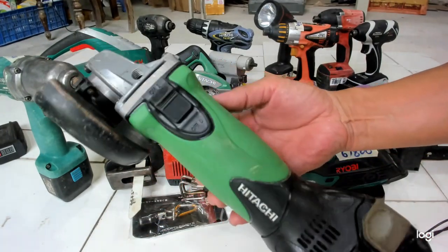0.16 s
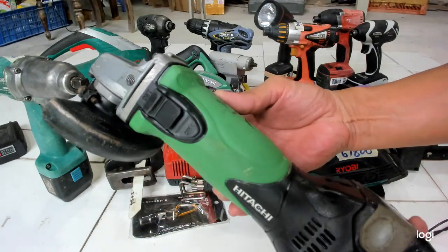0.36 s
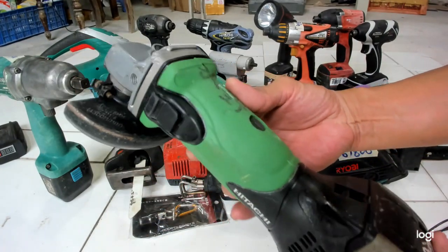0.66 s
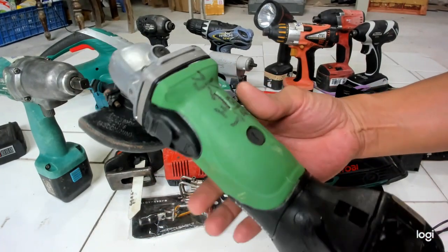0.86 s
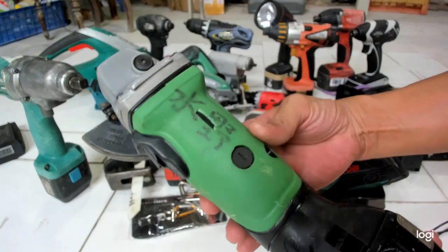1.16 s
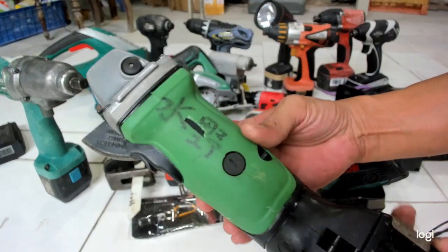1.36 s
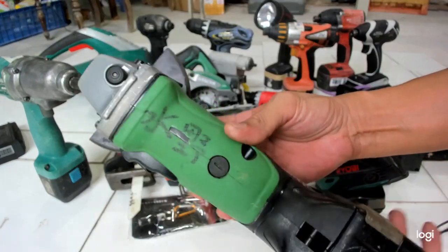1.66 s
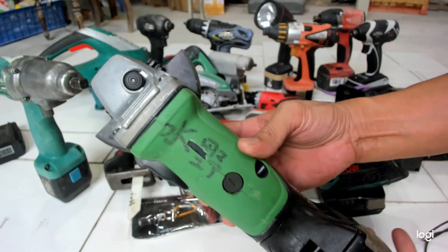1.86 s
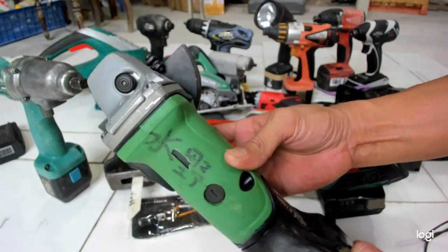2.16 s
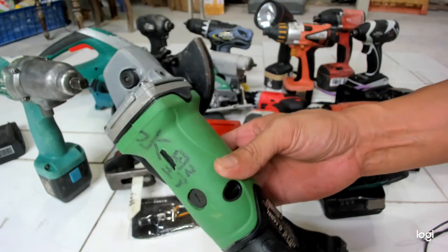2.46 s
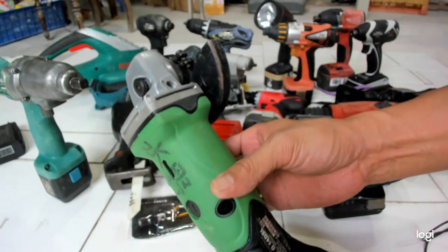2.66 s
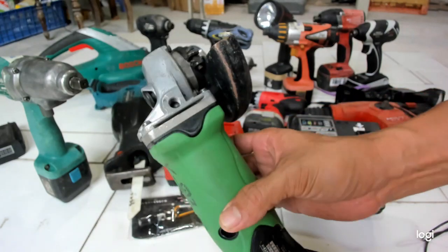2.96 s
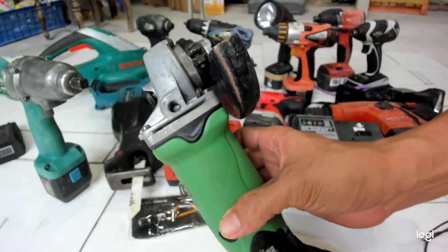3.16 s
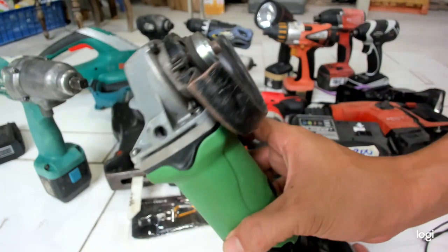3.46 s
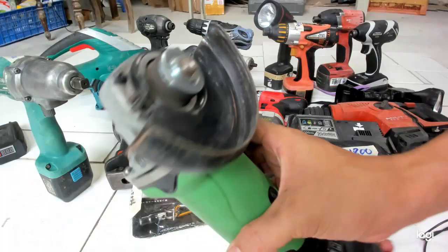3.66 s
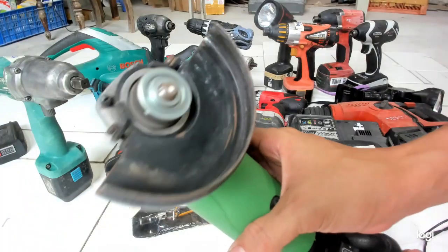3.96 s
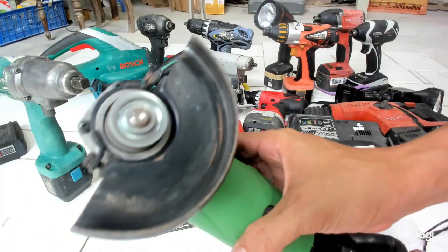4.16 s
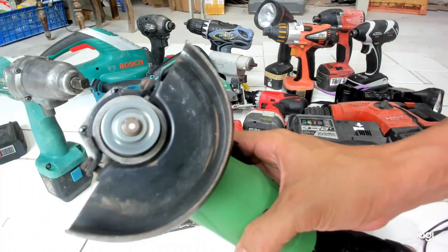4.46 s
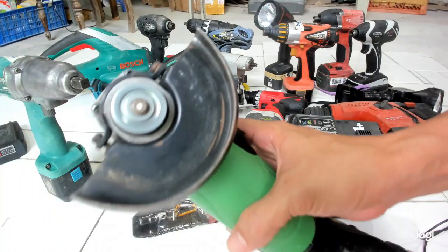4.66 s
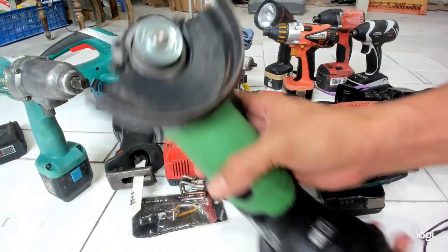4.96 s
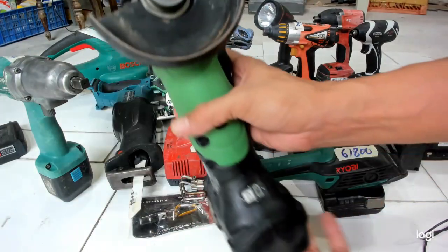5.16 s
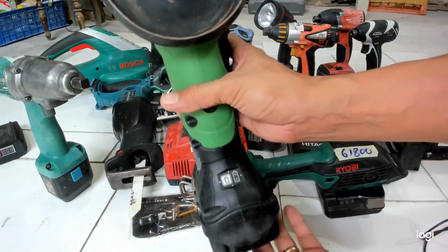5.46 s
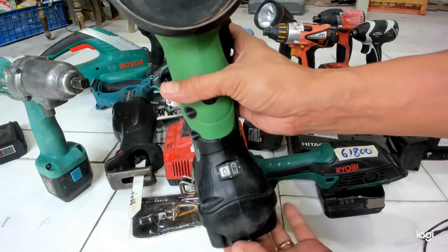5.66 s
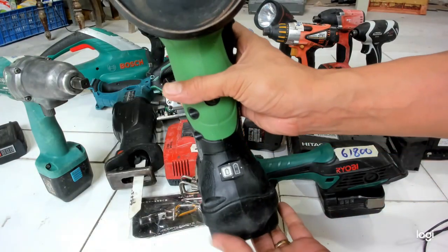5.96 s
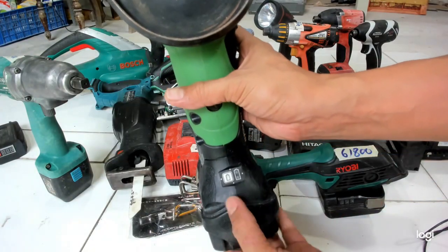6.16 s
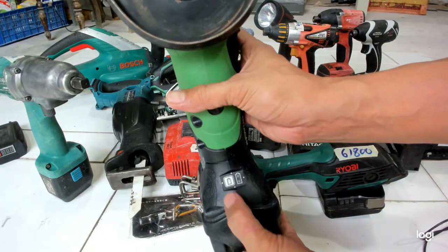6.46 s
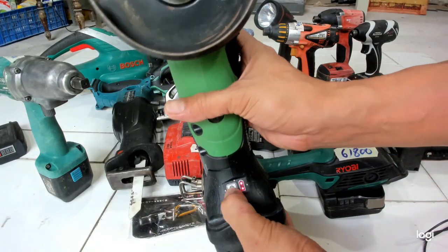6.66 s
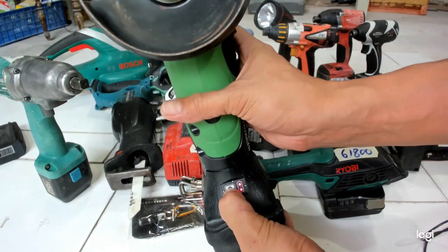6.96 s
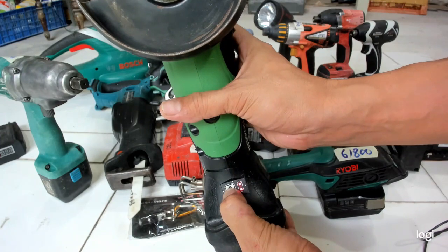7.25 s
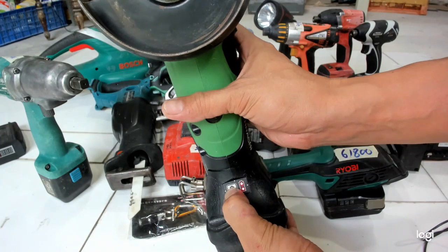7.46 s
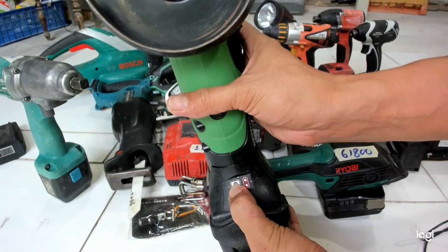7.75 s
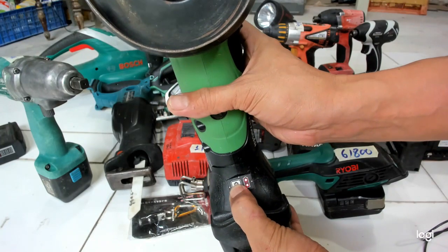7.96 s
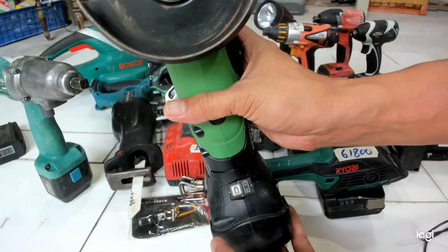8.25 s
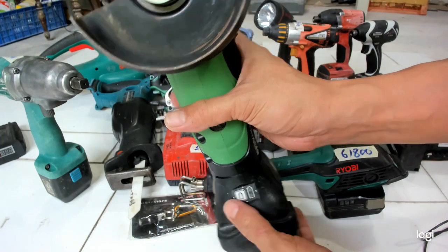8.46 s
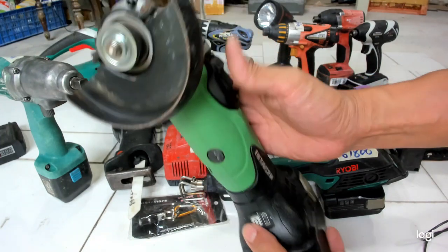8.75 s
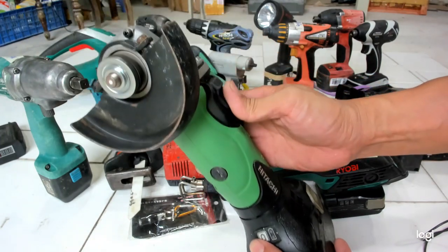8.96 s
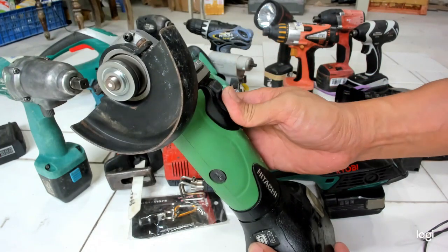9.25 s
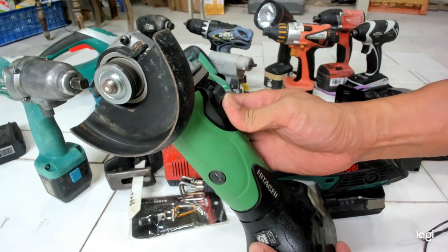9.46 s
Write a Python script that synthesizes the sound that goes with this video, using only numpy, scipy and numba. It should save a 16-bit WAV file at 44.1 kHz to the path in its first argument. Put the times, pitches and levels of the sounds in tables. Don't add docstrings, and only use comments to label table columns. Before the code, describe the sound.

Close unloaded power tool: strong buzzing whine, gear rattle and airy fan hiss, joined by sharp ringing steel chatter, the whine fading at the very end.

```python
import sys
import numpy as np
from scipy import signal
from scipy.fft import rfft, irfft, next_fast_len
from scipy.io import wavfile
from scipy.ndimage import uniform_filter1d, map_coordinates
from numba import njit

SR = 44100
rng = np.random.default_rng(int(sys.argv[2]) if len(sys.argv) > 2 else 0)


def bounce(signal):
    frames = np.transpose(np.atleast_2d(signal))
    limited = np.clip(frames, -1, 1)
    pcm = np.round(limited * 32767).astype(np.int16)
    wavfile.write(sys.argv[1], SR, pcm)


def elevation(decibels):
    levels = np.asarray(decibels, float)
    return 10 ** (levels / 20)


N = 422919

RUN_HZ, COLD_HZ, WARM_S = 361.6, 360.4, 1.2
OFF_S, SLOWS_HZ_PER_S, FADES_DB_PER_S = 9.33, 190, 39
# [t/s, angle/deg]
ROLL = [
    (0, 1),
    (5.25, 209.5),
    (8.3, 234.5),
    (9.33, 270),
    (9.59, 281),
]
# [order, level/dB]
ROUND_ORDERS = [(1, -44), (2, -36), (3, -35.5), (5, -43.5), (6, -40), (7, -36), (8, -44), (14, -38),
                (21, -77)]
# [order, level re shell/dB]
SHELL_ORDERS = [(4, -14), (9, -17), (11, -27), (12, -23), (14.32, -23.5), (32, -21)]
# [order, angle/deg, half width/deg, level/dB]
BEAMS = [(1, 13, 17.2, -26), (1, 137, 20.9, -24), (1, 182, 25, -36.5), (2, 4.5, 9.3, -26.5),
         (2, 45, 9.8, -26.5), (3, 23, 9.9, -20), (3, 50.5, 10.4, -17.5), (3, 95, 9.4, -31.5),
         (3, 194, 8.1, -36.5), (3, 274.5, 5.1, -25), (5, 35, 18, -27), (5, 108, 11, -25), (5, 150, 35, -24),
         (5, 259, 15.3, -32), (6, 4, 17, -24.5), (6, 65.5, 22.7, -21), (7, 5, 21, -20),
         (7, 134, 9.3, -26.5), (8, 34, 28, -26.5), (8, 84, 11, -28), (8, 122, 8.4, -19), (14, -3, 18, -22),
         (14, 72, 11.7, -18.5), (14, 112.5, 9.1, -18.5), (14, 143.5, 9.6, -15.5), (21, 13, 18, -23.5),
         (21, 63, 23, -26), (21, 103, 7.6, -17.5), (12, 98, 17, -23), (7, 283, 6.4, -18)]

# [f/Hz, level/dB, t60/s]
FLANGE_MODES = [(6763, 0.5, 0.086), (6810, -15, 0.066), (10673, -8, 0.046), (14610, -20.5, 0.098),
                (2879.5, -7, 0.04), (8790, -19, 0.016)]
# [t/s, peak level/dB, free flight/ms]
SINGLE_BLOWS = [(1.2424, -21, 5.1), (2.1948, -5, 8.8), (2.524, -7, 6), (3.2699, 1, 5.1), (3.7816, 4, 9.2),
                (3.8316, 3, 11.6), (4.5223, -2, 38), (4.854, 4, 7.4), (4.8983, 4, 23), (5.1997, 1, 7.8),
                (5.232, -2, 5), (5.3785, 0, 4.7), (5.4618, 0.5, 19), (6.1003, 1, 6.4), (6.5371, -2, 7),
                (6.5803, 0, 12.7), (7.186, 1.5, 10.2), (7.36, 1, 9.4), (7.3738, 1, 9.7),
                (7.4095, -0.5, 11.4), (7.7801, -1, 9), (8.1254, 2, 8.9), (8.7383, 1, 21), (8.771, 1.5, 7),
                (8.937, 0, 7), (8.9874, -1, 12), (9.0116, 3, 11), (9.0508, -3, 7), (9.123, -3, 8),
                (9.1673, -4, 9)]
# [t/s, peak level/dB, free flight/ms]
FURTHER_BLOWS = [(2.061, -10.5, 10), (5.251, -11, 6), (5.4283, -7, 6), (5.5504, 1.5, 11), (5.7934, -9, 6.2),
                 (4.73, -4, 6), (8.793, -8, 6.3), (9.2744, -9, 6), (9.5829, -9, 6.6), (5.569, -1.5, 12),
                 (6.0121, -1, 8.9), (6.0223, -3, 7), (6.128, 0, 6), (6.145, 3, 21), (7.9659, 3.5, 29),
                 (8.4117, 0, 6.8), (8.694, -5, 6), (9.181, -3, 27), (9.213, -5, 7), (9.2874, -6, 7),
                 (9.423, -6, 6), (9.4357, -1, 5.9), (9.4539, 2, 5), (9.492, -8, 5.4), (9.5626, -6.5, 7)]
# [t/s, length/s, level/dB]
SPELLS = [(1.856, .13, -13), (3.649, 0.031, -4.5), (3.7183, 0.032, 0), (3.8875, 0.13, -3.5),
          (4.1502, 0.098, -0.5), (4.294, 0.19, -3.5), (4.5544, 0.041, 3), (4.6438, 0.059, 1.5),
          (4.769, .05, -2.5), (5.0128, 0.17, -2.5), (5.2936, 0.046, -5), (5.5056, 0.018, 0),
          (5.598, 0.17, -2.5), (5.846, 0.15, -2.5), (6.192, 0.11, 0), (6.35, 0.065, -3),
          (6.451, 0.049, -2.5), (6.6171, 0.053, -0.5), (6.701, 0.16, -2), (6.9094, 0.0966, -0.5),
          (7.0574, 0.057, 1), (7.2288, .085, -1), (7.4422, 0.32, 0), (7.92, .02, 1.5), (8.018, 0.046, -4.5),
          (8.188, 0.21, -2), (8.4388, 0.12, -2), (8.601, 0.045, 0), (8.8653, 0.041, 0.5),
          (9.3184, 0.07, -8)]
TURN_MS, SCATTER_MS, ALOFT = 6.38, 1.2, 0.7
PER_TURN_DB, UNEVEN_DB = 0.5, 2.5

# [t/s, level/dB]
TOOTH_SLAP = [(0, -5.5), (5.2, 3.5), (5.43, 5.5), (5.77, -2), (5.95, 4.5), (6.3, -1), (6.55, 2), (6.7, -1),
              (6.87, 0.5), (7.2, -2), (7.5, -2), (7.8, -5), (8.1, 2.5), (8.4, -2), (8.8, -1), (9.3, -4.5),
              (9.59, -8)]
# [angle/deg, f/Hz, level/dB]
CASE = [(0, 1760, -18), (46.2, 1700, -12.5), (56, 960, -14.5), (66.8, 1610, -15.5), (101, 1860, -15.5),
        (122, 1630, -23.5), (127.6, 1590, -16.5), (187, 1580, -22.5), (198.4, 1240, -18),
        (202.7, 1464, -24), (228, 1430, -25), (272.7, 1570, -21)]
GUARD = [(0, 2605, -8.5), (94, 3045, -21), (123, 2780, -17), (140, 2880, -23), (170, 2670, -21.5),
         (198.5, 2657, -29.5), (230, 2290, -21), (230, 2370, -22.5), (259.6, 2610, -24.5), (272, 2670, -17)]
GEAR_HEAD = [(0, 5280, -12), (73.4, 5050, -12.5), (89, 5210, -21.5), (118.4, 5330, -15.5), (128, 5100, -31),
             (131, 5200, -16.5), (168, 5280, -26.5), (212.3, 5270, -37), (225, 5600, -16),
             (213, 5520, -19.5), (280, 5680, -28.5)]
COVER = [(69, 4300, -43.5), (74.4, 4400, -17.5), (101, 4250, -19.5), (145, 4760, -30), (201, 4250, -21.5),
         (205, 4250, -39), (243.6, 4022, -48), (250, 3820, -23), (262, 3740, -52)]
NUT = [(0, 10200, -37), (119, 10300, -41), (129, 10700, -27), (146, 10300, -29), (170, 10600, -38),
       (242.4, 10100, -38.5), (250, 10000, -24), (280.5, 10270, -24)]

# [angle/deg, roar level/dB]
VENTS = [(0, -13.5), (40, -18.5), (72, -38), (88, -19.5), (92, -21), (96, -19.5), (116, -14.5),
         (124, -20.5), (132, -11.5), (136, -30), (141, -18.5), (147, -27), (168, -37), (240, -34),
         (250, -24.5), (262, -22), (280, -29)]
# [f/Hz, density/dB]
ROAR_SPECTRUM = [(4500, -120), (6500, 1), (9000, 4.5), (10600, -4), (14000, -120)]
# [f/Hz, density/dB]
HISS_SPECTRUM = [(7000, -120), (10500, -6), (12500, -2), (16000, -16)]
# [f/Hz, density/dB]
SHELL_SPECTRUM = [(200, -120), (420, -13), (1030, -4.5), (1300, -6), (3500, -6.5), (6000, -3.5),
                  (16000, -30)]
# [f/Hz, density/dB]
RUMBLE_SPECTRUM = [(20, -8), (60, -12), (200, 4.5), (320, 3), (1000, -120)]
HISS_DB, HISS_DB_PER_DB, SHAKEN_DB = -32.5, .6, 7

THIN_MOMENTS = [(0.25), (0.293), (0.401), (0.473), (0.721), (0.996), (1.509), (1.597), (1.936), (2.577),
                (3.515), (4.127), (4.476), (4.621), (4.754), (5.033), (6.319), (6.713), (7.29), (7.526),
                (8.722), (9.189), (9.34)]


def shaft_angle():
    settling_hz = (RUN_HZ - COLD_HZ) * np.exp(-np.arange(N) / SR / WARM_S)
    hz = RUN_HZ - settling_hz - SLOWS_HZ_PER_S * since_off()
    return 2 * np.pi * np.cumsum(hz * (1 + 0.00059 * wobble(25))) / SR


def whine(angle):
    roll, shell = curves(ROLL)[0], shell_db()
    gain = {order: elevation(db) for order, db in ROUND_ORDERS}
    for order, db in SHELL_ORDERS:
        gain[order] = elevation(db + shell + 1.4 * wobble(1.447))
    for order, deg, half_width, db in BEAMS:
        beam = np.exp(-np.log(2) * ((roll - deg) / half_width) ** 2)
        gain[order] = gain[order] + elevation(db) * beam
    tones = np.zeros(N)
    for order, g in gain.items():
        flutter = elevation(2.5 + 2.5 * wobble(20) + 1.2 * wobble(5))
        tones += g * flutter * np.sin(order * angle + 2 * np.pi * rng.random())
    return tones * elevation(-FADES_DB_PER_S * since_off())


def flange():
    draw = rng.random((900, 3))
    chatter = np.c_[draw[:, 0] * N / SR, -30 + 14 * draw[:, 1], 3 + 4 * draw[:, 2]]
    blows = np.r_[SINGLE_BLOWS, FURTHER_BLOWS, dance()]
    steel = elevation(2) * ring(blows, crack=0.072) + elevation(roar_db() + 23.5) * ring(chatter, crack=0.38)
    return steel * elevation(4.0 * wobble(180))


def dance():
    draw = rng.standard_normal((len(SPELLS), 3, 40))
    turns = np.clip(np.round(2.2 + .9 * draw[:, 0]), 1, 4)
    flight_ms = turns * TURN_MS + SCATTER_MS * draw[:, 1]
    start_s, length_s, db = np.transpose(SPELLS)[:, :, None]
    after_s = (np.cumsum(flight_ms, axis=1) - flight_ms) / 1000
    peak_db = db + PER_TURN_DB * (turns - 2) + UNEVEN_DB * draw[:, 2]
    rows = np.stack([start_s + after_s, peak_db, ALOFT * flight_ms], axis=2)
    return rows[after_s < length_s]


def ring(hits, crack):
    start_s, peak_db, flight_ms = np.transpose(hits)[:, :, None]
    t = np.arange(2048) / SR
    luck = rng.standard_normal((len(hits), len(FLANGE_MODES)))
    detune = 1 + 0.0045 * luck[:, :1]
    steel = 0
    for k, (hz, db, t60_s) in enumerate(FLANGE_MODES):
        decay = elevation(db + 0.089 * db * luck[:, [k]] - 60 * t / t60_s)
        steel = steel + decay * np.sin(2 * np.pi * hz * detune * t)
    touch = elevation(-60 * np.maximum(t - flight_ms / 1000 + 0.0035, 0) / 0.035)
    onset = 1 - np.exp(-t / 0.00036)
    noise = np.diff(rng.standard_normal((len(hits), len(t))), prepend=0)
    blow = crack * elevation(-60 * t / 0.05) * noise
    rows = elevation(peak_db) * (steel * touch * onset + blow)
    at = np.round(start_s * SR).astype(int) + np.arange(len(t))
    return np.bincount(at.ravel(), rows.ravel(), N + 2 * len(t))[:N]


def rattle(angle):
    slap_db = curves(TOOTH_SLAP)[0]
    shared = knocks(angle, per_s=120, spread_db=20, hiss=.2)
    parts = [(CASE, 360, 1.2), (GUARD, 340, 2.05), (GEAR_HEAD, 400, 1.65), (COVER, 400, 0.58)]
    metal = resonance(shared, NUT, width_hz=640)
    for table, width_hz, follows in parts:
        own = shared + 0.65 * knocks(angle, per_s=200, spread_db=17.5, hiss=0.43)
        metal = metal + elevation(follows * slap_db) * resonance(own, table, width_hz)
    return elevation(-1.0) * metal


def knocks(angle, per_s, spread_db, hiss):
    ticks = (rng.random(N) < per_s / SR) * elevation(spread_db * rng.random(N)) * rng.choice([-1, 1], N)
    turn = 1 + .15 * np.cos(angle) + .2 * np.cos(angle * 13 / 30)
    clumps = elevation(0.55 * wobble(12) + 2.56 * wobble(60))
    return turn * clumps * (unit(ticks) + hiss * rng.standard_normal(N))


def cooling_air(angle):
    roar = roar_db()
    hiss_db = HISS_DB + HISS_DB_PER_DB * (roar + 27)
    flow = knocks(angle, per_s=250, spread_db=37, hiss=0.31) * elevation(0.91 * wobble(15))
    vents = elevation(roar) * filtered(flow, coloured(ROAR_SPECTRUM))
    vents = vents + elevation(hiss_db) * filtered(flow, coloured(HISS_SPECTRUM))
    inside = knocks(angle, per_s=1500, spread_db=9, hiss=1.78)
    shell = elevation(shell_db() + 2.0) * filtered(inside, coloured(SHELL_SPECTRUM))
    slap_db = curves(TOOTH_SLAP)[0]
    return patchy(elevation(-0.5) * vents + elevation(0.22 * slap_db) * shell, depth_db=1.64)


def rumble():
    noise = filtered(rng.standard_normal(N), coloured(RUMBLE_SPECTRUM))
    return elevation(-45.5 + 0.47 * (shell_db() + 21.5)) * noise


def room(clatter):
    tail = rng.standard_normal(SR // 4) * elevation(-60 * np.arange(SR // 4) / SR / 0.11)
    return elevation(-10.5) * signal.fftconvolve(clatter, tail / np.linalg.norm(tail))[:N]


def since_off():
    return np.maximum(np.arange(N) / SR - OFF_S, 0)


def shell_db():
    sides_db = facing(CASE)[1] + facing(GUARD)[1]
    return uniform_filter1d(sides_db, SR) / 2 - 0.46 * FADES_DB_PER_S * since_off()


def roar_db():
    t = np.arange(N) / SR
    dancing = sum((t > start_s) & (t < start_s + length_s) for start_s, length_s, _ in SPELLS)
    return facing(VENTS)[0] + SHAKEN_DB * (uniform_filter1d(1. * dancing, SR // 20) - .5)


def facing(rows):
    roll, (deg, *cols) = curves(ROLL)[0], np.transpose(rows)
    return [np.interp(roll, deg, c) for c in cols]


def curves(rows):
    s, *cols = np.transpose(rows)
    return [np.interp(np.arange(N) / SR, s, c) for c in cols]


def resonance(x, table, width_hz):
    hz, db = facing(table)
    for _ in range(2):
        x = two_pole(x, 2 * np.pi * hz / SR, np.exp(-np.pi * width_hz / SR))
    return elevation(db) * unit(x)


@njit
def two_pole(x, turn, radius):
    y = np.zeros(len(x))
    for i in range(2, x.size):
        y[i] = x[i] - x[i - 2] + 2 * radius * np.cos(turn[i]) * y[i - 1] - radius * radius * y[i - 2]
    return y


def patchy(x, depth_db):
    z = signal.stft(x, nperseg=512)[2]
    field = uniform_filter1d(rng.standard_normal(z.shape), 12, 0)
    field = uniform_filter1d(field, 16, 1)
    return signal.istft(z * elevation(depth_db * unit(field)), nperseg=512)[1][:N]


def filtered(x, response):
    m = next_fast_len(N + 8192)
    return unit(irfft(rfft(x, m) * response(np.fft.rfftfreq(m, 1 / SR)), m)[:N])


def coloured(points):
    f, db = np.transpose(points)
    return lambda hz: elevation(np.interp(np.log(hz + 1), np.log(f + 1), db))


def wobble(rate_hz):
    coarse = np.arange(0, N + 16, 16)
    knots = rng.standard_normal(int(N * rate_hz / SR) + 4)
    return np.interp(np.arange(N), coarse, map_coordinates(knots, [coarse * rate_hz / SR]))


def unit(x):
    return x / np.sqrt(np.mean(x ** 2) + 1e-20)


def scene():
    angle = shaft_angle()
    clatter = flange() + rattle(angle) + cooling_air(angle) + rumble()
    return (whine(angle) + clatter + room(clatter))[None]


def dropouts(x):
    hz, t, z = signal.stft(x, SR, nperseg=1024, noverlap=768)
    thin = sum(np.exp(-((t - s) / .011) ** 2) for s in THIN_MOMENTS)
    size = np.abs(z) * (1 + hz[:, None] / 6000) ** 0.39
    weak = size < 2.5 * np.median(size, axis=1, keepdims=True)
    return signal.istft(z * elevation(-20 * thin * weak), SR, nperseg=1024, noverlap=768)[1][:, :N]


def top_cut(x):
    return signal.sosfilt(signal.butter(12, 15720, fs=SR, output="sos"), x)


def record(dry):
    clipped = dry / (1 + np.abs(dry / .74) ** 5) ** (1 / 5)
    return top_cut(dropouts(clipped))


dry = scene()
out = record(dry)
bounce(out)
```